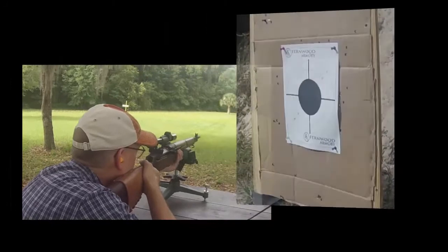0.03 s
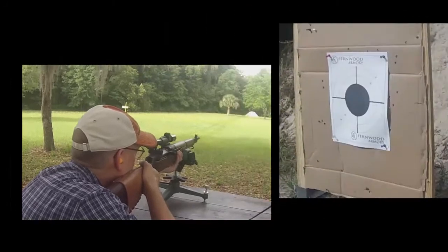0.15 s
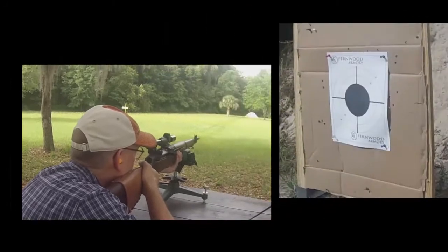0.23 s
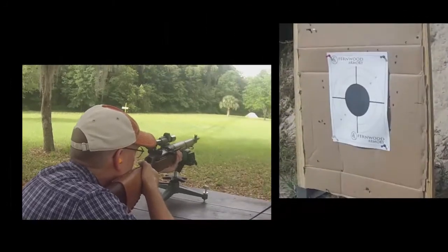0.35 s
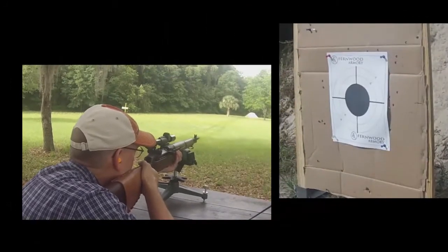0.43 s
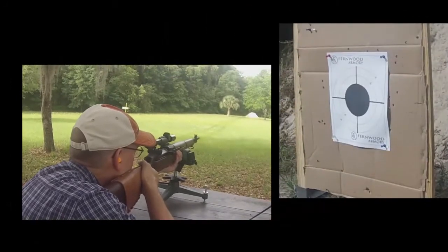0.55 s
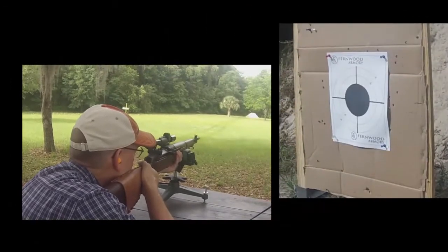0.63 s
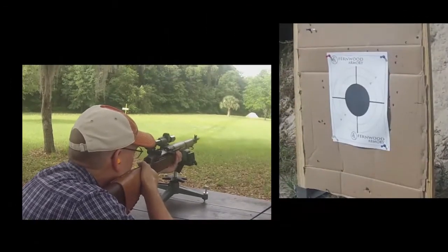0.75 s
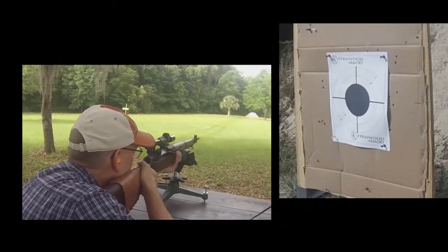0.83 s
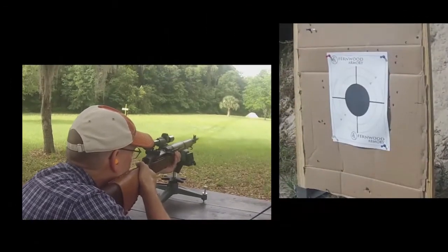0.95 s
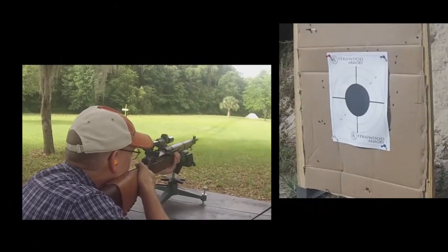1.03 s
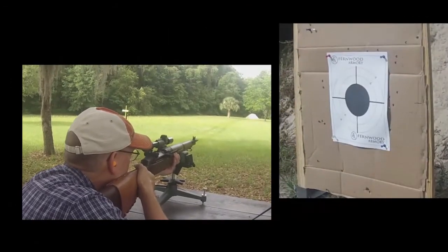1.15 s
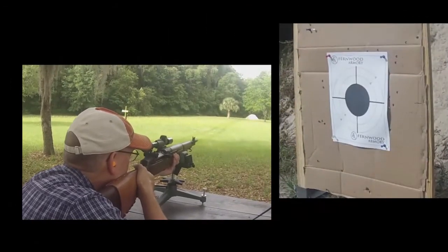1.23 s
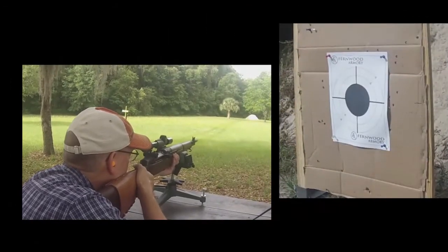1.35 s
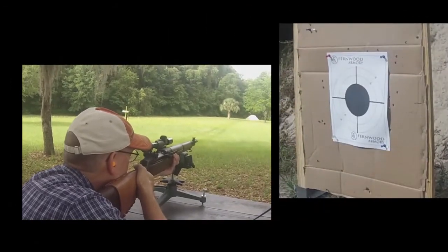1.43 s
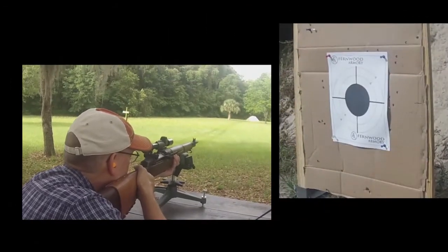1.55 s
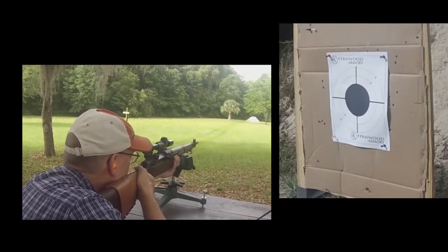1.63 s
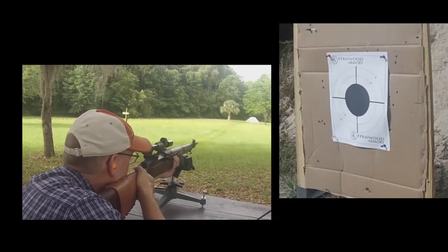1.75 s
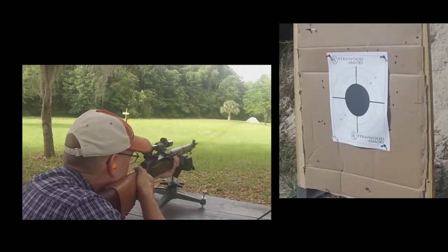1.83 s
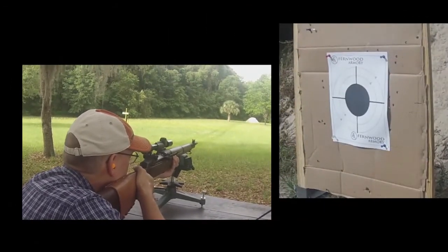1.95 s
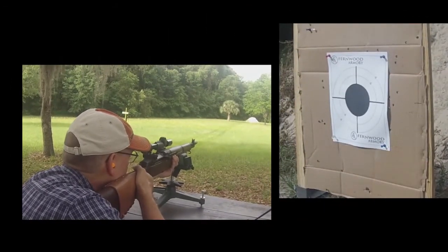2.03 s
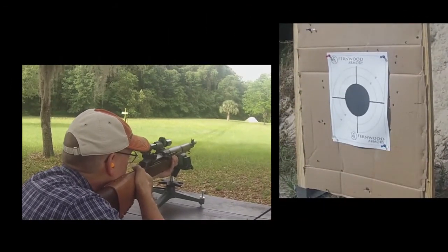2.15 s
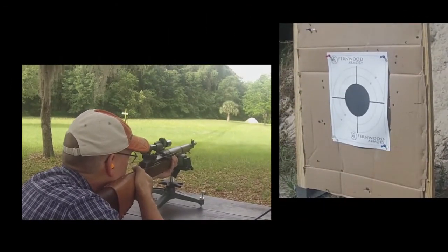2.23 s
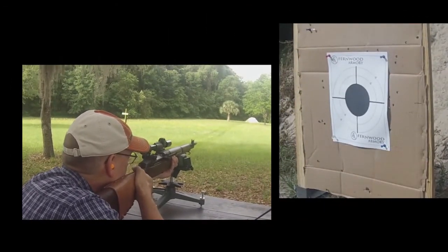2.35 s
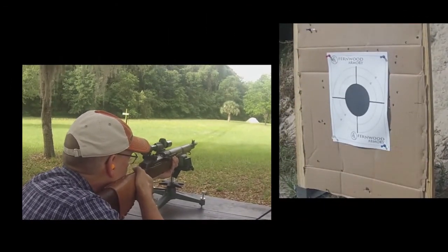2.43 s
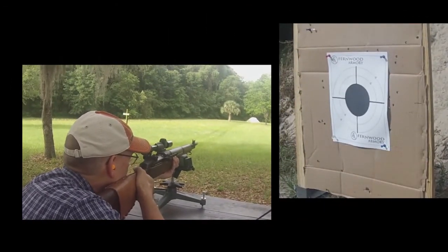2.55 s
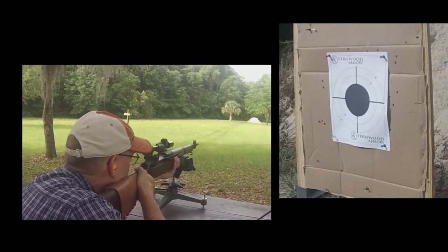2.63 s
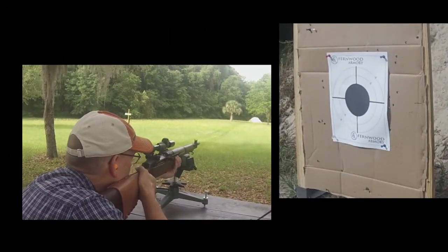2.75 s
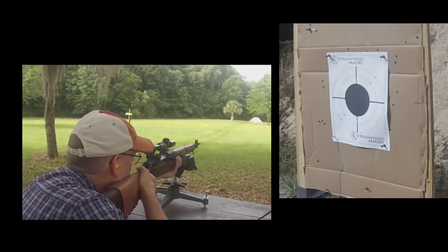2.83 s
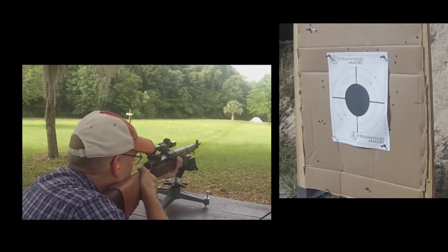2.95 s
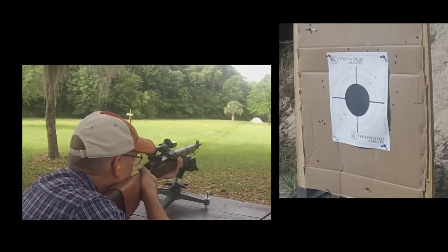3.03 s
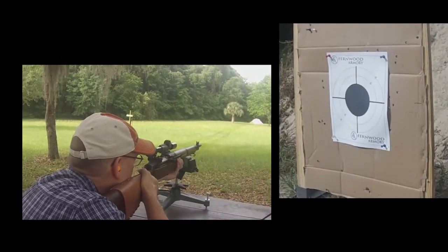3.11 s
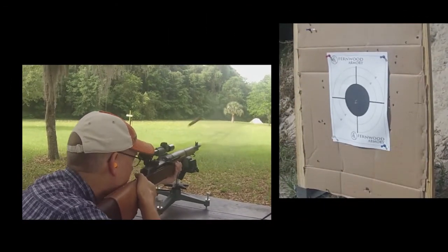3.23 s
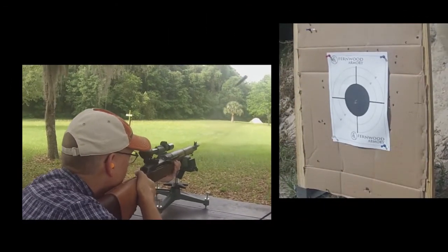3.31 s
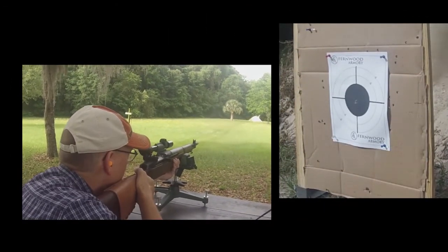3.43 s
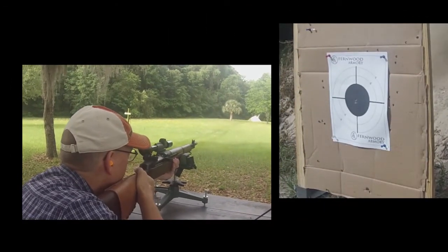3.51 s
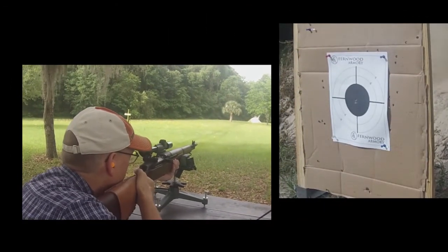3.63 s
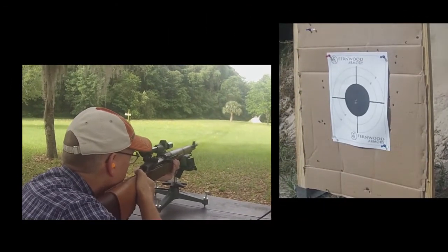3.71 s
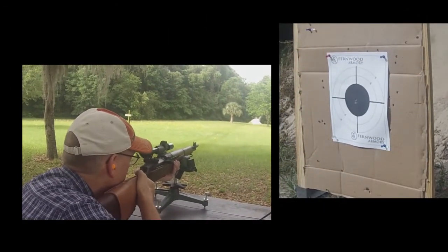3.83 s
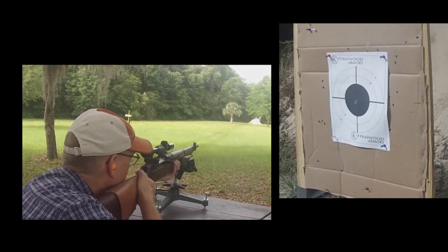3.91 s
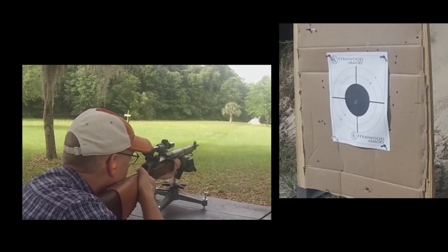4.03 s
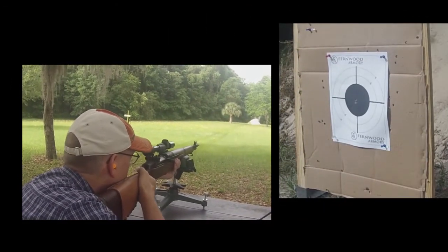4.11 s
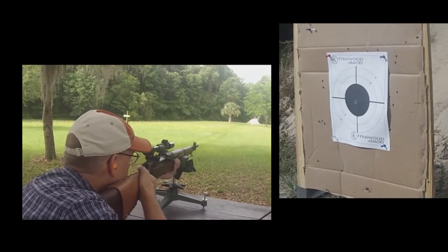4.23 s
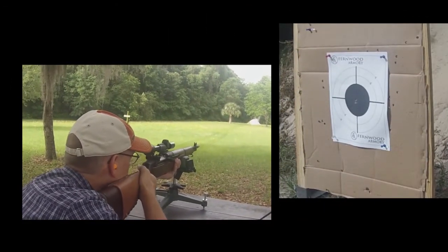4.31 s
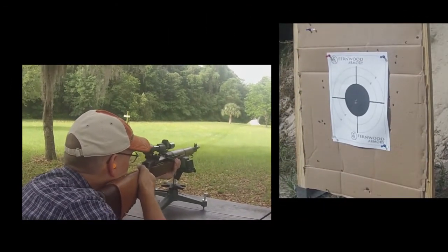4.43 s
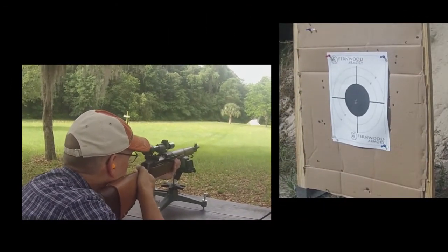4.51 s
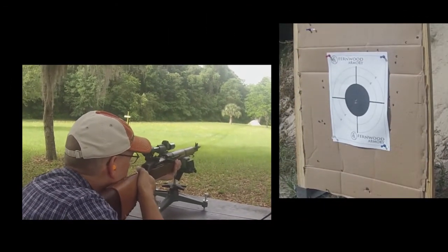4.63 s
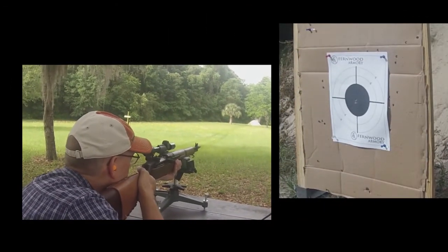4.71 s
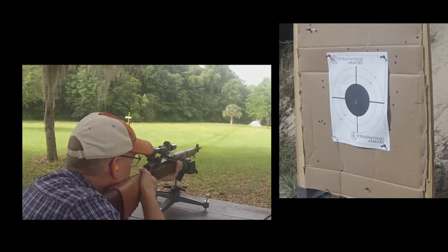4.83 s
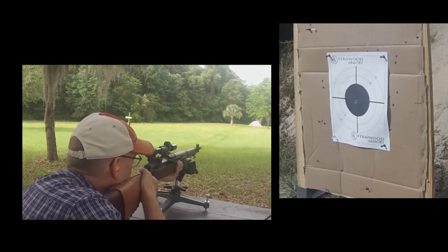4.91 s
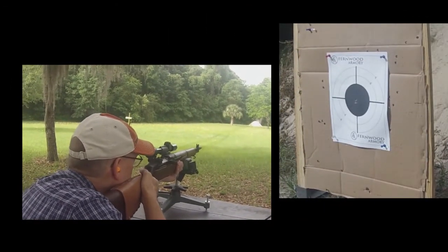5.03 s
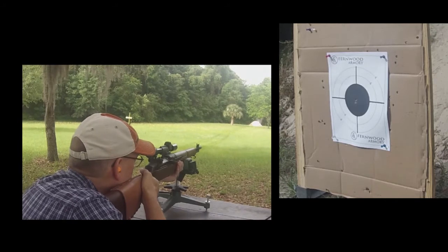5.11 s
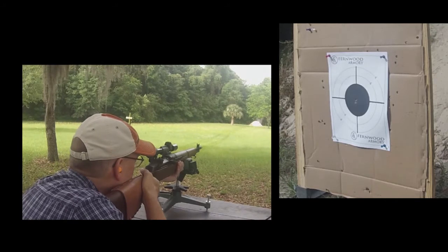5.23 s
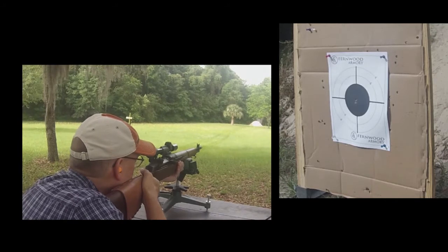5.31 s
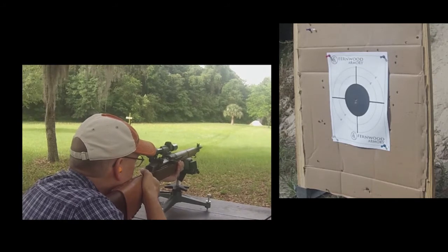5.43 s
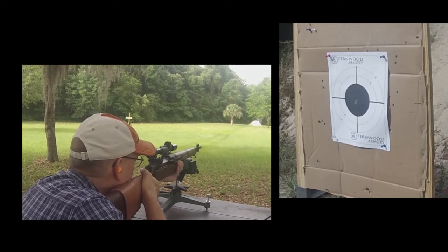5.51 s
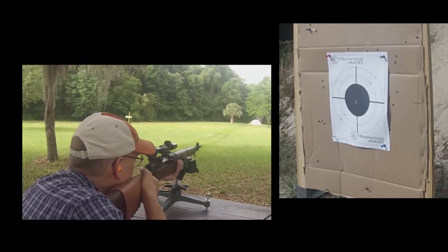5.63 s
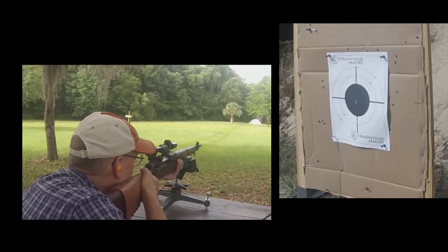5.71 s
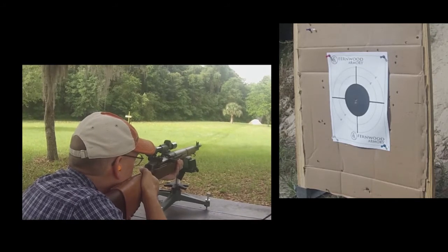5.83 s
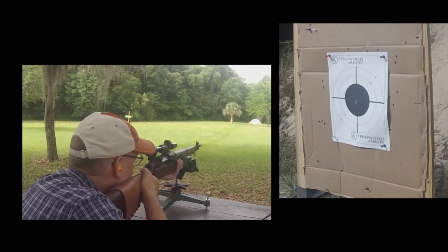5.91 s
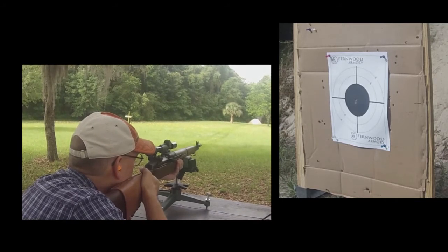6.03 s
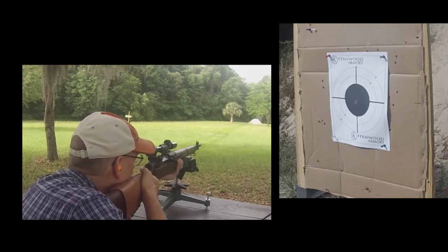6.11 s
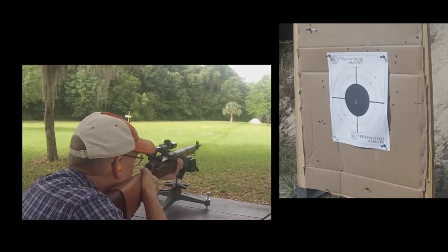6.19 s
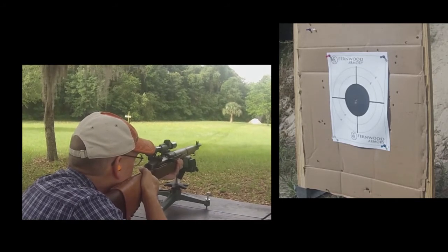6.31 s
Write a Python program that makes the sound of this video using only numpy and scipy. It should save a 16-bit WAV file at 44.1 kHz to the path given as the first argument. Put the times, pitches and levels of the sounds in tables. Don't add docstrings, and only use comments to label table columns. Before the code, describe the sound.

A small camera just behind a shooter hears a quiet field ringed by trees: low, soft hush of air, leaves and far traffic. From 0 to 0.6 s thin distant bird whistles sound; from 0.25 to 1.75 s a hoarse bird gives fast buzzy trills, ending in sharp high chips. A very faint insect rasp pulses around 11 kHz until 2.4 s. At 1.1 s the safety catch knocks the wooden stock, short and dry. A tiny trigger click comes at 2.86 s. At 3.2 s one rifle shot explodes, clipped and brutally abrupt. Dull trunk slaps follow, then the tree line answers strongly at 3.48 s, rolling and darkening until about 5.3 s. At 4.15 s a spent case ticks and rings faintly, with tiny rolling ticks. Insect rasp returns near 4.6 to 5.3 s; faint far whistles close from 5.2 to 6 s over the recovering hush.

```python
import sys
import numpy as np
from scipy import signal
from scipy.io import wavfile
from scipy.ndimage import uniform_filter1d

SR = 44100
rng = np.random.default_rng(int(sys.argv[2]) if len(sys.argv) > 2 else 0)


def attenuation_scalar(level_db):
    decades = np.asarray(level_db, float) / 20
    return 10 ** decades


def wrap_up_sound(samples):
    columns = np.atleast_2d(samples).T
    tamed = np.clip(columns, -1, 1)
    steps = np.round(tamed * 32767).astype(np.int16)
    wavfile.write(sys.argv[1], SR, steps)


N = 280476
TIME = np.arange(N) / SR
TREE_LINE_S = 3.475


def unit(x):
    return x / np.sqrt(np.mean(x ** 2))


def band(x, hz, width_hz):
    edges_hz = np.clip([hz - width_hz / 2, hz + width_hz / 2], 10, SR / 2 - 500)
    return signal.sosfilt(signal.butter(2, edges_hz, "bandpass", fs=SR, output="sos"), x)


def noise_band(hz, width_hz, size):
    return unit(band(rng.standard_normal(size), hz, width_hz))


def walk(rate_hz, size):
    hold = int(SR / rate_hz)
    steps = np.repeat(rng.standard_normal(size // hold + 1), hold)
    return uniform_filter1d(uniform_filter1d(steps, hold), hold)[:size]


def add(out, start_s, x):
    i = int(start_s * SR)
    out[i:i + len(x)] += x[:N - i]


def third_octave_db(spectrum, hz):
    table_hz, table_db = np.transpose(spectrum)
    return np.interp(np.log(hz), np.log(table_hz), table_db) + 10 * np.log10(hz)


def ring(hz, t60_s, rough, width_hz, hold=1, size=16384):
    t = TIME[:size]
    rough = np.clip(rough, 0, 1)
    tone = -(1 - rough) * np.sin(2 * np.pi * hz * t) + rough * noise_band(hz, width_hz, len(t))
    return tone * attenuation_scalar(-60 * (t / t60_s) ** hold)


def hush():
    # (frequency [Hz], level [dB per Hz])
    air_spectrum = [(12, -37), (20, -1), (182, -5.5), (241, -10.5), (399, -13), (499, -18.5), (590, -14.5),
                    (780, -18), (1150, -20), (5530, -30.5), (9670, -36.5), (14700, -42), (16000, -58)]
    out, swell = 0, walk(1.5, N)
    for hz in 22 * 2 ** np.arange(0, 9.6, 1 / 3):
        unrest_db = (1.5 * swell + 2.0 * walk(5.3, N)) * np.clip(300 / hz, .3, 1)
        out = out + attenuation_scalar(third_octave_db(air_spectrum, hz) + unrest_db) * noise_band(hz, hz / 4, N)
    blast_s, recovery_s = 3.203, 0.85
    duck_db = -14 * (TIME > blast_s) * np.exp(-(np.abs(TIME - blast_s) / recovery_s) ** 4)
    return attenuation_scalar(-54 + duck_db) * unit(out)


def insect():
    # (time [s], strength [0-1])
    singing = [(.35, 0), (.4, 1), (2.38, 1), (2.42, 0), (4.78, 0), (4.82, 1), (5.1, 1), (5.3, 0)]
    # (time [s], length [s], frequency [Hz], level [dB])
    strokes = [
        (.335, .04, 10900, -73),
        (4.64, 0.042, 11050, -73),
    ]
    pulses_hz = 9.6 * (1 + .2 * walk(8, N))
    beat = np.cos(2 * np.pi * np.cumsum(pulses_hz) / SR)
    gate = np.clip(3.1 * (beat - .6 + .3 * walk(9, N)), 0, 1)
    strength = np.interp(TIME, *np.transpose(singing))
    out = attenuation_scalar(-80) * strength * gate * noise_band(11300, 120, N)
    for start_s, length_s, hz, db in strokes:
        size = int(length_s * SR)
        add(out, start_s, attenuation_scalar(db) * np.hanning(size) ** .3 * noise_band(hz, 300, 4096)[:size])
    return out


def phrase(start_s, length_s, hz, db):
    rise_hz, release_s = 90, min(0.0514, length_s / 2)
    end_s = start_s + length_s
    return [(start_s, hz - rise_hz, db - 13),
            (start_s + 0.118 * length_s, hz - rise_hz, db - 3),
            (end_s - release_s, hz + rise_hz, db),
            (end_s, hz + rise_hz, db - 28)]


def warble(contour, rate_hz, depth_hz, gap, rough_hz):
    s, hz, db = np.transpose(contour)
    t = np.arange(s[0], s[-1], 1 / SR)
    phase = np.cumsum(rate_hz * (1 + 0.09 * walk(35, len(t)))) / SR % 1
    pitch_hz = np.interp(t, s, hz) + depth_hz * (.12 - phase ** 2.4) + rough_hz * walk(700, len(t))
    fade = np.clip(np.minimum(t - s[0], s[-1] - t) / 0.0072, 0, 1)
    level_db = np.interp(t, s, db) + 1.7 * walk(159, len(t)) - 9.9 * phase ** 2
    strength = attenuation_scalar(level_db) * np.sin(np.pi * phase) ** gap
    return strength * fade * np.sin(2 * np.pi * np.cumsum(pitch_hz) / SR)


def whistle(length_s, first_hz, last_hz, rough_hz):
    u = np.linspace(0, 1, int(length_s * SR))
    pitch_hz = first_hz + (last_hz - first_hz) * u + rough_hz * walk(388, len(u))
    strength = attenuation_scalar(1.8 * walk(49, len(u))) * np.sin(np.pi * u) ** 0.52
    return strength * np.sin(2 * np.pi * np.cumsum(pitch_hz) / SR)


def birds():
    # (time [s], length [s], centre [Hz], peak [dB])
    trills = [(.24, .06, 6050, -64), (.395, 0.27, 5720, -56), (0.699, .23, 5750, -50.5),
              (.97, .31, 5820, -48), (1.303, 0.13, 5950, -54.5)]
    buzz = (1.28, 0.24, 7380, -49.5)
    # (time [s], length [s], first [Hz], last [Hz], level [dB])
    early_whistles = [(0.0, 0.048, 2920, 2760, -68), (.028, .065, 2500, 2660, -68),
                      (0.151, 0.13, 2720, 2990, -67), (0.26, .074, 2750, 2400, -67),
                      (.27, .063, 2950, 2860, -70), (.41, .044, 3300, 3400, -71),
                      (.453, .03, 3950, 4070, -76), (0.423, .125, 2730, 2990, -65.5),
                      (.525, .03, 2800, 2400, -67), (.55, .066, 2410, 2650, -67),
                      (.587, .09, 3500, 3960, -75)]
    late_whistles = [(5.23, .34, 3322, 3294, -71), (5.74, .1, 3766, 4280, -72),
                     (5.84, .13, 3055, 3950, -67)]
    # (time [s], length [s], first [Hz], last [Hz], level [dB])
    chips = [(.598, .012, 7000, 7000, -68), (1.288, 0.023, 8340, 7400, -62), (1.42, .024, 8100, 8600, -68),
             (1.54, 0.011, 6820, 7540, -50), (1.568, 0.028, 6550, 6700, -53),
             (1.609, 0.017, 5080, 5980, -54), (1.622, .028, 5800, 5460, -66),
             (1.643, .014, 4400, 5500, -57), (1.655, .05, 5400, 4600, -62), (1.7, .07, 4750, 4600, -70),
             (1.702, .011, 6060, 7700, -58), (1.713, .03, 7280, 7300, -53.5),
             (1.716, 0.0277, 6910, 7250, -47.5)]
    near, far = np.zeros(N), np.zeros(N)
    for row in trills:
        song = warble(phrase(*row), rate_hz=36, depth_hz=1500, gap=0.21, rough_hz=260)
        add(near, row[0], attenuation_scalar(-2.5) * song)
    song = warble(phrase(*buzz), rate_hz=140, depth_hz=1196, gap=1.3, rough_hz=297)
    add(near, buzz[0], attenuation_scalar(5.5) * song)
    for bus, calls, rough_hz in ((far, early_whistles, 50), (far, late_whistles, 10.5), (near, chips, 150)):
        for start_s, length_s, first_hz, last_hz, db in calls:
            add(bus, start_s, attenuation_scalar(db) * whistle(length_s, first_hz, last_hz, rough_hz))
    t = TIME[:SR]
    leaves = rng.standard_normal(SR) * (attenuation_scalar(-60 * t / .5 - 35.0) + attenuation_scalar(-60 * t / 0.076 - 20.5))
    leaves[0] = 1
    return signal.fftconvolve(near + attenuation_scalar(-8.5) * far, leaves)[:N] + attenuation_scalar(1.5) * far


def handling():
    # (frequency [Hz], level [dB], t60 [s])
    stock_modes = [(363, -0.5, 0.021), (480, -0.5, 0.032), (670, -2.5, 0.024), (970, -19, 0.011),
                   (1790, -9, 0.0065), (2180, -5, 0.0069), (2820, -7, 0.0095), (3400, -14.5, 0.0096),
                   (4600, -15, 0.0065)]
    # (frequency [Hz], level [dB], t60 [s])
    case_modes = [(8050, -14, 0.094), (9711, -8, .4), (14310, -24, .1)]
    # (time [s], level [dB], centre [Hz], t60 [ms])
    ticks = [(1.1016, -34, 4800, 6), (1.1016, -43, 8800, 4), (2.86, -54, 8800, 8), (3.11, -61, 8000, 20),
             (4.151, -40.5, 8000, 16), (4.153, -31, 3000, 22), (4.157, -42, 6800, 11),
             (4.1572, -36, 12500, 11), (4.175, -55.5, 9440, 150), (4.2, -66, 7500, 590),
             (4.3, -70, 7300, 900), (4.335, -68.5, 10060, 180), (4.388, -64, 12500, 9.7),
             (4.415, -67, 9900, 140), (4.536, -61, 8500, 90), (4.58, -65, 7400, 20), (5.35, -65, 11000, 34),
             (5.6, -64.5, 11000, 20), (5.81, -62, 10970, 13.5)]
    out = np.zeros(N)
    stock = 0
    for k, (hz, db, t60_s) in enumerate(stock_modes):
        stock = stock + (-1) ** k * attenuation_scalar(db) * ring(hz, t60_s, 0.22, hz / 3, hold=1.8, size=4096)
    add(out, 1.1021, attenuation_scalar(-24.5) * band(stock, 4100, 8400))
    add(out, 2.8595, attenuation_scalar(-38.5) * ring(2900, 0.0067, .3, 1500, hold=1.5))
    for hz, db, t60_s in case_modes:
        add(out, 4.157, attenuation_scalar(-52) * attenuation_scalar(db) * ring(hz, t60_s, 0, hz / 9))
    for start_s, db, hz, t60_ms in ticks:
        add(out, start_s, attenuation_scalar(db) * ring(hz, t60_ms / 1000, 0.98, .7 * hz))
    return out


def roll():
    # (time [s], level [dB])
    envelope = [(3.218, -1), (3.3, -8.5), (3.46, -5.5), (3.475, -0.5), (3.75, -3.5), (4.5, -11.3),
                (5.0, -20), (5.3, -25), (6.36, -35)]
    # (frequency [Hz], level [dB per Hz])
    woods = [(18, -59), (30, -22), (124, -8.5), (295, -18.5), (499, -3.5), (684, 1.5), (866, 2),
             (1350, -12), (2000, -9.5), (2900, -9.5), (4780, -24.5), (8520, -26), (9700, -36), (12300, -39),
             (14800, -58), (16000, -83)]
    s, level_db = np.transpose(envelope)
    t = TIME[int(s[0] * SR):]
    elapsed_s = t - t[0]
    field_hz = 299.8
    field_db = 13 * np.exp(-elapsed_s / .4)
    trunk_place, trunk_draw = rng.random((400, 2)).T
    arrivals = np.zeros(len(t))
    arrivals[(trunk_place * len(t)).astype(int)] = -np.log(trunk_draw)
    clap_age = TIME[:2048] / .003
    claps = signal.fftconvolve(arrivals, clap_age * np.exp(-clap_age))[:len(t)].clip(0)
    out = 0
    for hz in 37.5 * 2 ** np.arange(0, 8.7, 1 / 3):
        air_db = -42 * (hz / 8000) ** 1.75 * (t - 3.6).clip(0)
        grass_db = 7 * min(hz / 8000, 1.3) ** 2 * np.exp(-elapsed_s / .17)
        dip_share = 1 / (1 + (hz / 4500) ** 4) / (1 + (field_hz / hz) ** 4)
        dip = np.where(t < TREE_LINE_S, dip_share, 1)
        db = third_octave_db(woods, hz) + dip * np.interp(t, s, level_db)
        db = db + field_db / (1 + (hz / field_hz) ** 2) + air_db + grass_db + 1.2 * walk(25, len(t))
        clap_share = .6 * np.clip((t - 3.5) / 0.64, .15, 1) * np.exp(-elapsed_s / 1.4)
        clap_share = (clap_share * np.clip(1100 / hz, .3, 1)).clip(0, 1)
        grain = np.sqrt(1 - clap_share + clap_share * claps / claps.mean())
        out = out + attenuation_scalar(db) * grain * noise_band(hz, hz / 4, len(t))
    return np.pad(out * attenuation_scalar(-60.0), (N - len(t), 0))


def shot():
    # (time [s], length at 1 kHz [ms], rings (frequency [Hz], level [dB]))
    striker = (3.1941, 21, [(2200, -36), (4500, -40), (12000, -52.5)])
    muzzle = (3.2024, 20, [(640, -3), (1110, -2), (2300, -12), (4800, -22), (11500, -25)])
    bench = (3.2058, 14, [(140, -15), (786, -2.5), (1550, -7), (1900, -5), (2900, -7), (3400, 1),
             (8600, -8.5), (13000, -17)])
    ground = (3.2092, 18, [(275, -10), (391, -2.5), (7000, -24.5), (12000, -30)])
    roof = (3.217, 9.6, [(2250, -3.5), (5550, 1), (7540, -17), (14000, -21)])
    # (time [s], peak [dB], ring [Hz])
    echoes = [(3.237, -11.5, 876), (3.249, -19, 860), (3.273, -18, 890), (3.315, -16, 950),
              (3.325, -17, 550), (3.344, -22, 710), (3.368, -16, 870), (3.387, -10.5, 527),
              (3.409, -17.5, 880), (3.437, -18, 825), (3.469, -15.5, 825), (3.491, -27, 888.7),
              (3.519, -15.5, 519), (3.565, -17.5, 735), (3.59, -16, 840), (3.609, -18, 540),
              (3.632, -20.5, 630), (3.664, -22, 673), (3.684, -21, 670), (3.719, -18, 816),
              (3.764, -21, 726), (3.805, -15, 740), (4.259, -36, 760)]
    out = np.zeros(N)
    for start_s, length_ms, rings in (striker, muzzle, bench, ground, roof):
        for hz, db in rings:
            rough = .2 + (hz / 12500) ** 2
            t60_s = length_ms / 1000 * (hz / 1000) ** -.2
            add(out, start_s, attenuation_scalar(db) * ring(hz, t60_s, rough, .4 * hz, hold=2.2, size=4096))
    rise = 1 - np.exp(-TIME[:4096] / 0.0004)
    for start_s, db, hz in echoes:
        bark_db = -29.5 - 9 * (start_s - TREE_LINE_S)
        bark = attenuation_scalar(bark_db) * ring(2600, 0.033, 1.0, 2000, size=4096)
        trunk = attenuation_scalar(db + 2.5) * ring(hz, 0.02, 0.072, 0.8 * hz, size=4096)
        add(out, start_s, band(rise * (trunk + bark), 2300, 4400))
    return out


def scene():
    return (hush() + insect() + birds() + handling() + roll() + shot())[None]


def top_cut(x):
    return signal.sosfilt(signal.butter(12, 16370, fs=SR, output="sos"), x)


def record(dry):
    cut = signal.sosfilt(signal.ellip(8, .2, 45, 15050, fs=SR, output="sos"), dry)
    smooth = signal.sosfilt(signal.butter(6, 15900, fs=SR, output="sos"), np.clip(cut, -1, 1))
    return top_cut(np.clip(smooth, -1, 1))


dry = scene()
out = record(dry)
wrap_up_sound(out)
```